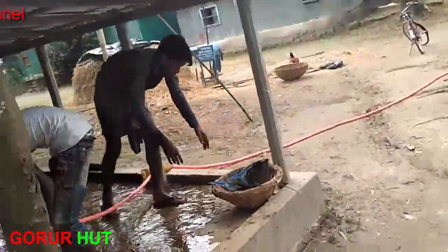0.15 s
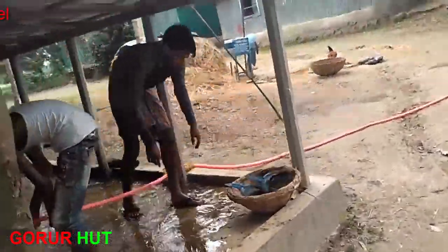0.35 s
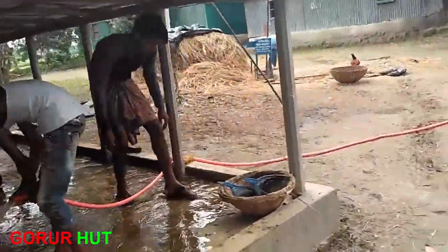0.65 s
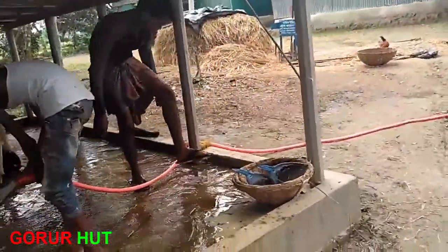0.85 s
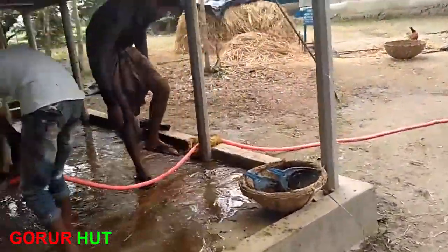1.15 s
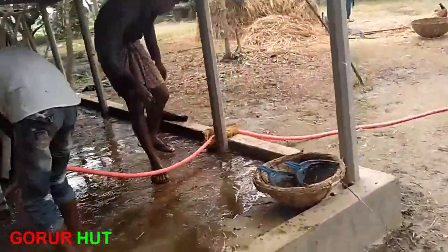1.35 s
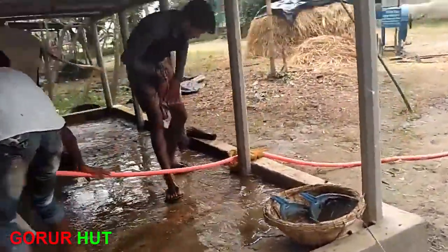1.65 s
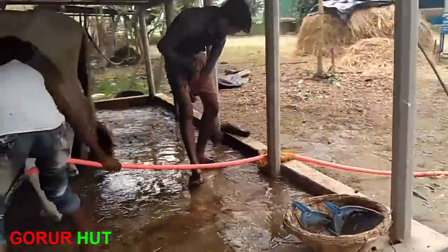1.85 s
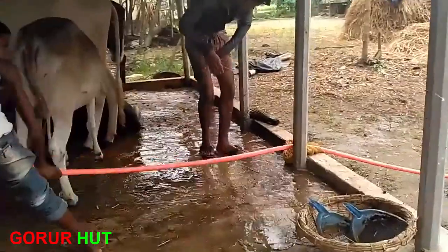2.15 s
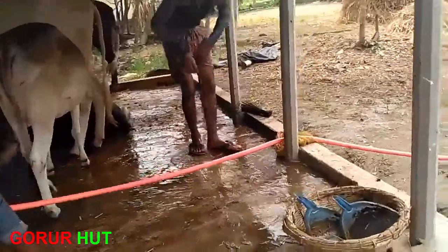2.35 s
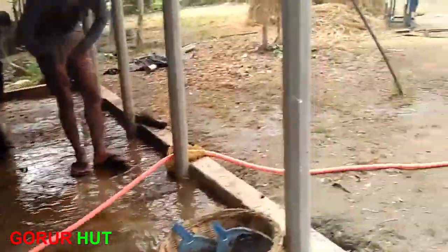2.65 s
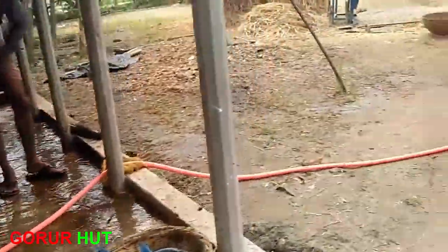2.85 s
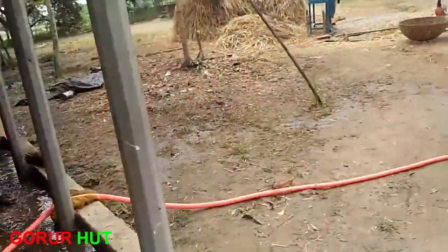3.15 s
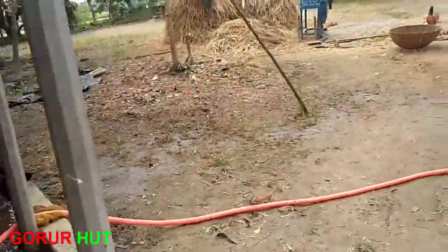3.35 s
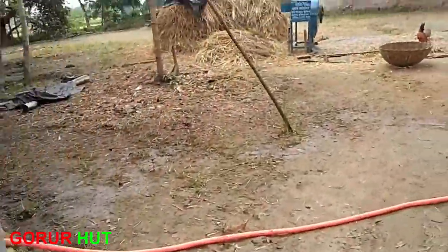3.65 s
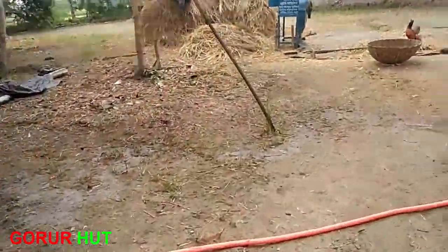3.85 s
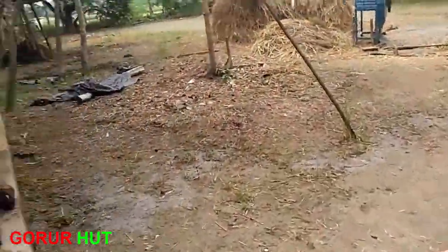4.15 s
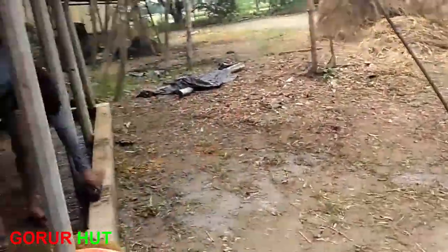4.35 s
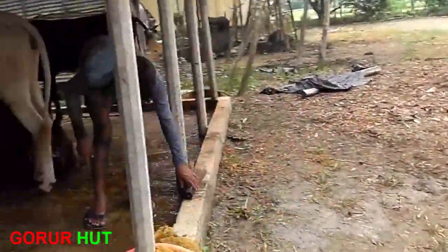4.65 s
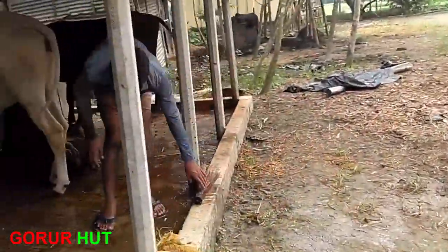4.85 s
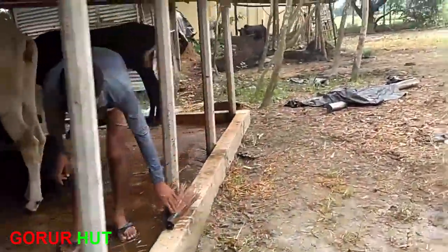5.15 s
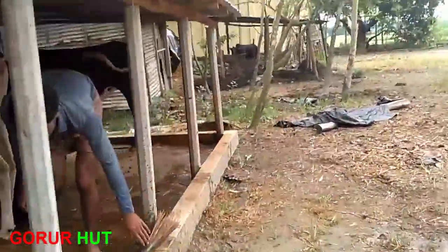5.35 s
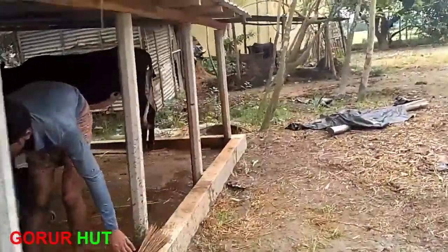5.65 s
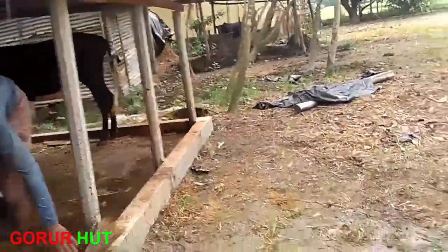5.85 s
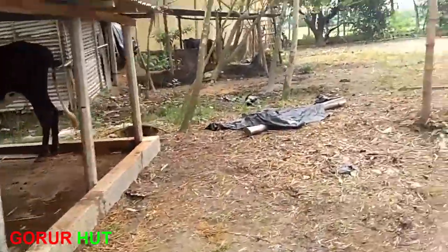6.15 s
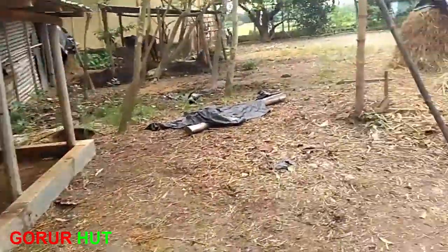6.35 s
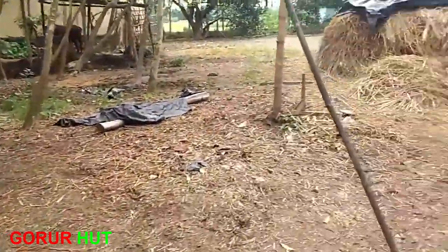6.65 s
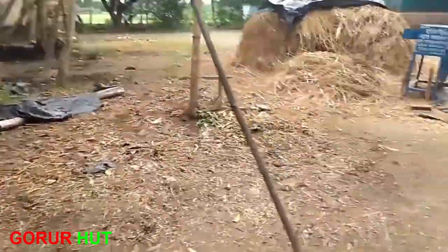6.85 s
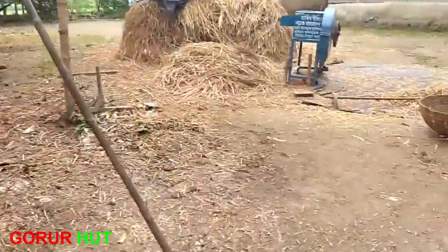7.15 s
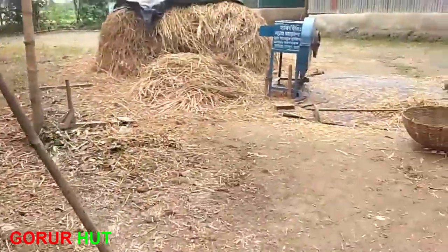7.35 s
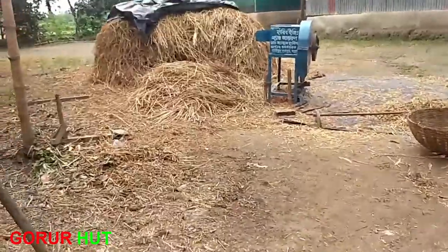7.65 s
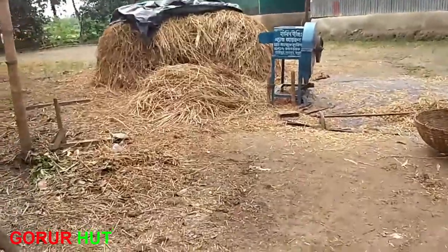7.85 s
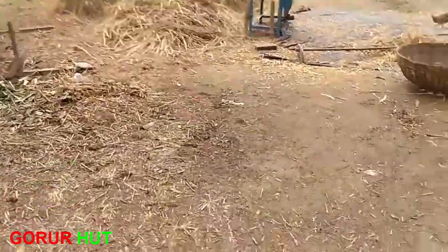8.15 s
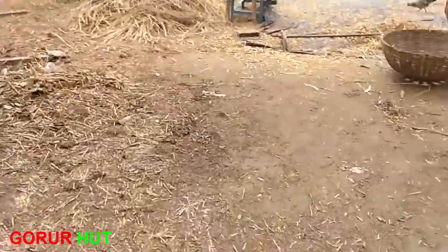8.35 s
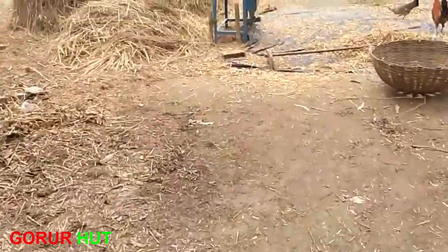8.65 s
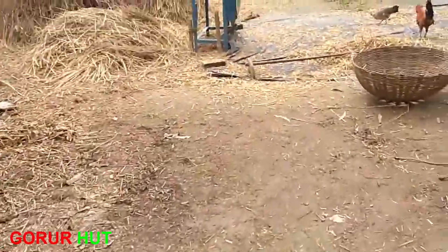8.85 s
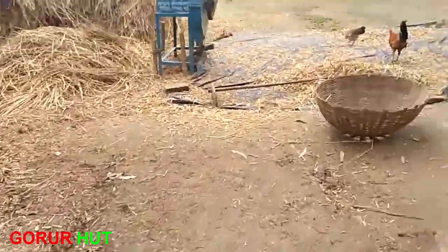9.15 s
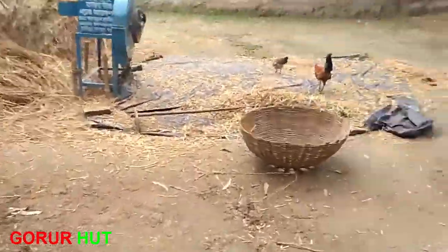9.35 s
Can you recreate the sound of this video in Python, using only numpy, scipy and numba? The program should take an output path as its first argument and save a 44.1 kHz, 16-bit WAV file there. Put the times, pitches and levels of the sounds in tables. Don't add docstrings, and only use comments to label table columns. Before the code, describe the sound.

Water splashes, slaps and trickles on wet concrete in an open farm shed, with bubbly burbles, drips, a faint pump hum and wind bumps.

```python
import sys
import numpy as np
from scipy import signal
from scipy.fft import rfft, irfft, next_fast_len
from scipy.io import wavfile
from scipy.ndimage import uniform_filter1d, map_coordinates
from numba import njit

SR = 44100
rng = np.random.default_rng(int(sys.argv[2]) if len(sys.argv) > 2 else 0)


def nominal_scale(level):
    x = np.asarray(level, float) / 20
    return 10 ** x


def unload_audio(sound):
    columns = np.transpose(np.atleast_2d(sound))
    steps = np.round(np.clip(columns, -1, 1) * 32767)
    wavfile.write(sys.argv[1], SR, steps.astype(np.int16))


N = 418509


def curve(table):
    s, *values = np.transpose(table)
    return [np.interp(np.arange(N) / SR, s, v) for v in values]


def upright(table):
    return [c[:, None] for c in np.transpose(table)]


def draws(events, kinds, count):
    return rng.random((events, kinds, count)).transpose(1, 0, 2)


def colour(x, points, share=1):
    hz, db = np.transpose(points)
    size = next_fast_len(N)
    f = np.maximum(np.arange(size // 2 + 1) * SR / size, 1)
    gain = nominal_scale(share * np.interp(np.log(f), np.log(hz), db))
    return irfft(rfft(x, size) * gain, size)[..., :N]


def unit(x):
    return x / np.sqrt(np.mean(x ** 2))


def hiss(lo_hz, hi_hz, channels=1):
    sos = signal.butter(3, [lo_hz, hi_hz], "band", fs=SR, output="sos")
    return unit(signal.sosfilt(sos, rng.standard_normal((channels, N))))


def walk(rate):
    k = int(SR / rate)
    steps = np.repeat(rng.standard_normal(N // k + 1), k)
    return 2.05 * uniform_filter1d(uniform_filter1d(steps, k), k)[:N]


def patches(start, hz, seconds=.028, octaves=0.258):
    field = rng.standard_normal((400, 40))
    return 1.68 * map_coordinates(field, [start / seconds, np.log2(hz / 300) / octaves], order=1)


@njit
def ring(n, start, hz, t60, gain, rise, swell):
    y = np.zeros(n)
    for k in range(len(start)):
        length = int(t60[k] * SR) + 1
        p = np.exp((2j * np.pi * hz[k] - np.log(1000) / t60[k]) / SR)
        glide = np.exp(2j * np.pi * hz[k] * rise[k] / SR / length)
        z, first = gain[k] + 0j, max(int(start[k] * SR), 0)
        for i in range(min(length, n - first)):
            grown = min(i * hz[k] / SR / swell, 1.)
            y[first + i] += z.imag * grown * grown * (3 - 2 * grown)
            z, p = z * p, p * glide
    return y


def bubbles(start, hz, t60, gain, rise, swell):
    spread = np.broadcast_arrays(start, hz, t60, gain, rise)
    flat = [np.array(a, dtype=float).ravel() for a in spread]
    return ring(N, *flat, swell)


def pump(db):
    hz = 185 + 1.6 * walk(9)
    line = np.sqrt(2) * np.sin(2 * np.pi * np.cumsum(hz) / SR) * nominal_scale(2.76 * walk(15))
    line_db = 0.59 * np.minimum(db + 53.5, 0) - 3.0
    housing = nominal_scale(-12.5) * hiss(298.8, 316)[0] + nominal_scale(-1.5) * hiss(131, 438)[0]
    return nominal_scale(db) * (nominal_scale(line_db) * line + housing)


# peak time in seconds, peak level in dB, pitch in Hz.
WIND_POPS = [(2.46, -41, 81), (2.511, -41, 91.6), (2.573, -33.5, 83.5), (3.177, -42, 101),
             (3.311, -39, 88.6), (4.097, -46, 97), (4.109, -43, 96.5), (4.493, -37, 97),
             (4.516, -32.5, 114), (6.309, -43, 106), (6.968, -34.5, 98.5), (7.045, -36.5, 127),
             (7.112, -26, 142), (7.136, -28, 121), (7.155, -33.5, 120), (7.211, -40.5, 83.5),
             (7.294, -40, 90), (7.367, -30.5, 127), (8.844, -34, 115), (8.874, -32.5, 135),
             (9.014, -35, 133), (9.148, -29.5, 80.7), (9.18, -16.5, 120), (9.212, -42, 92),
             (9.287, -20.5, 171), (9.36, -27, 113.5), (9.473, -33.5, 112)]
WAKE_DB, WAKE_S = -25.5, 0.046
GUST_DB = 3.2


def wind(db):
    s, pop_db, hz = np.transpose(WIND_POPS)
    pops = bubbles(s - .75 / hz, 1.07 * hz, 4.2 / hz, nominal_scale(pop_db + 9.0), -.6, 0.45)
    t = np.arange(N) / SR
    wake = sum(nominal_scale(2 * (d + WAKE_DB)) * np.exp(-np.abs(t - at) / WAKE_S * 2) for at, d in zip(s, pop_db))
    db = 10 * np.log10(nominal_scale(2 * db) + wake)
    rumble = hiss(50, 144.0, channels=2) * nominal_scale(db + GUST_DB * np.array([walk(21), walk(13)]))
    return rumble * nominal_scale([[7.0], [-9.0]]) + pops * nominal_scale([[0], [-21.0]])


DUCK_DB, DUCK_S = -4, 0.077


def wind_guard():
    s, pop_db, _ = upright(WIND_POPS)
    at = np.arange(0, N, 64)
    after = at / SR - s
    dip = nominal_scale(pop_db - pop_db.max()) * (after > 0) * np.exp(-np.maximum(after, 0) / DUCK_S)
    return nominal_scale(DUCK_DB * np.interp(np.arange(N), at, dip.sum(axis=0)))


# start in seconds, length in seconds, level of the middle drops in dB,
# fine spray in dB re middle, large drops in dB re middle.
GUSHES = [(0.245, 0.12, -52, -4.5, 2), (0.455, 0.36, -54, 0.5, -8.5), (0.677, 0.29, -57, 6.5, -19),
          (1.065, 0.37, -54.5, 6, -33), (1.553, 0.38, -71.5, 5.5, -19), (2.026, 0.26, -56.5, -5.5, -19),
          (2.378, 0.5, -62, -1, -3), (2.942, 0.33, -49.5, -2.5, -12.5), (3.186, 0.39, -58, -6, -12),
          (3.583, 0.31, -54.5, -5.5, -27), (4.096, 0.44, -62, 7.5, -7.5), (4.53, 0.81, -70.5, 14, -7),
          (5, 0.25, -52, 0.5, -17), (5.336, 0.45, -58.5, -0.5, -14), (5.76, 0.19, -52, -2, -13.5),
          (5.945, 0.36, -57.5, 5, -25), (6.195, 0.4, -51.5, -4.5, -4), (6.642, 0.25, -58, 3.5, -5.5),
          (6.883, 0.29, -50, -8, -7.5), (7.234, 0.38, -55.5, -10, 3.5), (7.603, 0.48, -58, -8.5, -2),
          (8.156, 0.58, -50.5, -6, -11.5), (8.744, 0.28, -49.5, -7.5, -1.5), (9.046, 0.2, -54.5, -12, -1),
          (9.227, 0.37, -59, -11, -6)]
TRICKLE_DB = [
    -80.5,
    -70,
    -73,
]
GUSH_ATTACK_S, GUSH_SAG_DB_PER_S, GUSH_DRAIN_DB_PER_S = 0.097, -2, 86.5


def gushes():
    t = np.arange(0, N / SR + .01, .004)
    s, length, db, fine_db, large_db = upright(GUSHES)
    fall_db = GUSH_SAG_DB_PER_S * (t - s) + GUSH_DRAIN_DB_PER_S * np.maximum(t - s - length, 0)
    shape = np.clip((t - s) / GUSH_ATTACK_S, 0, 1) ** 2 * nominal_scale(2 * (db - fall_db))
    levels = []
    for size_db, trickle_db in zip((fine_db, 0, large_db), TRICKLE_DB):
        power = np.sum(shape * nominal_scale(2 * size_db), axis=0) + nominal_scale(2 * trickle_db)
        levels.append(np.interp(np.arange(N) / SR, t, 10 * np.log10(power)))
    return levels


# lowest pitch in Hz, highest pitch in Hz, drops a second, ring in cycles,
# size spread in dB, smooth hiss in dB re drops.
DROPLET_SIZES = [
    (3850, 8150, 1800, 11, 8, 1.5),
    (1658, 3480, 700, 3.55, 5.5, 1.5),
    (520, 1553, 700, 4.6, 3.5, -1),
]
SURGE_DB, PATCHY_DB = .7, 1.3


def flow():
    near, blur, surge = 0, 0, walk(11)
    for (lo, hi, rate, cycles, spread_db, smooth_db), db in zip(DROPLET_SIZES, gushes()):
        u = rng.random((30000, 5)).T
        start = np.cumsum(-np.log(u[0])) / rate
        hz = lo * (hi / lo) ** u[1]
        size_db = spread_db * np.minimum(-np.log(u[2]), 3.0) + 2.44 * patches(start, hz)
        ringing = 2.9 * cycles * (1 + 5.2 * u[4] ** 6)
        strength = nominal_scale(size_db) * np.sqrt(hz / ringing) * (start < N / SR)
        drops = bubbles(start, hz, ringing / hz, strength, 0.49 * u[3], 2.27)
        gain = nominal_scale(db + SURGE_DB * surge + 1.01 * walk(30)) / np.sqrt(1 + nominal_scale(2 * smooth_db))
        near = near + gain * unit(drops)
        edges = np.geomspace(lo, hi, 4)
        patchy = sum(nominal_scale(PATCHY_DB * walk(25)) * hiss(a, b, channels=2) for a, b in zip(edges, edges[1:]))
        blur = blur + gain * nominal_scale(smooth_db) * unit(patchy)
    return near, blur


# start in
# seconds, length in seconds, level in dB, first pitch in Hz, last pitch in Hz.
BURBLES = [(0.266, 0.025, -25, 2330, 2350), (0.267, 0.029, -28.5, 1770, 1720),
           (8.574, 0.014, -31.5, 2060, 2100), (9.006, .006, -33, 1650, 1800), (0.54, .065, -40, 5100, 5070),
           (0.541, .15, -47.5, 1290, 1320), (0.749, 0.055, -41.5, 5200, 5330),
           (0.753, .06, -46, 3780, 3740), (6.199, 0.18, -47.5, 2620, 2570), (6.345, 0.17, -42, 2550, 2460),
           (6.506, 0.11, -53, 2500, 2560), (3.093, .022, -35.5, 5350, 5100),
           (0.173, 0.055, -48, 3750, 3750), (0.42, 0.012, -38, 3900, 4000),
           (1.159, 0.013, -36.5, 4000, 3640), (1.26, .035, -43, 3840, 3850),
           (1.263, 0.023, -45, 1340, 1280), (1.657, .012, -33.5, 2300, 2250),
           (2.76, 0.024, -46.5, 2330, 2090), (3.091, 0.021, -42, 4900, 5170),
           (3.619, 0.036, -40, 2500, 2360), (3.695, .03, -35.5, 2680, 2720),
           (3.702, 0.068, -39.5, 2250, 2350), (3.787, 0.041, -46, 3560, 3900),
           (3.819, 0.016, -37, 2180, 2200), (3.873, 0.035, -46.5, 2540, 2080),
           (4.016, 0.0073, -45, 2830, 2850), (4.048, 0.025, -42.5, 3660, 3700),
           (4.267, 0.013, -36.5, 2250, 2200), (4.328, .06, -45, 2330, 2550),
           (4.397, 0.053, -46, 5260, 5000), (4.629, 0.027, -40, 5660, 6000),
           (7.593, 0.024, -38, 2500, 2810), (7.611, 0.013, -36, 3900, 4040), (8.604, .025, -32, 2420, 2460),
           (8.7, 0.19, -53.5, 2770, 2900), (8.953, 0.016, -33.5, 4520, 4770),
           (8.948, 0.027, -30.5, 3250, 3380), (5.023, 0.023, -36.5, 2120, 2130),
           (0.163, 0.013, -36, 312, 302), (0.22, 0.029, -40, 950, 1400), (0.238, 0.063, -36, 322, 298),
           (2.931, 0.036, -36, 320, 308), (3.304, 0.041, -38, 477, 520), (4.141, .04, -43, 1160, 1180),
           (6.207, 0.17, -43, 410, 430), (6.5, 0.18, -47, 425, 400), (8.677, .25, -49, 760, 780),
           (8.863, .1, -46, 880, 890), (0.274, .03, -33, 845, 790)]
BURBLE_SPREAD, BURBLE_CYCLES, BURBLE_GAP_S = 0.062, 30, .004


def burbles(count=40):
    s, length, db, first_hz, last_hz = upright(BURBLES)
    u = draws(len(s), 3, count)
    late = BURBLE_GAP_S * (np.arange(count) + u[0])
    spread = BURBLE_SPREAD * np.maximum(1800 / first_hz, 1)
    drift_hz = first_hz + (last_hz - first_hz) * np.minimum(late / length, 1)
    hz = drift_hz * (1 + spread * (2 * u[1] - 1))
    gain = nominal_scale(db + 3.8 * np.minimum(-np.log(u[2]), 2.5)) * (late < length)
    t60 = BURBLE_CYCLES * BURBLE_SPREAD / spread / hz
    return bubbles(s + late, hz, t60, gain, 0.033, 2.02)


# start in seconds, peak level in dB, pitch in Hz, climb as a share of pitch.
CHIRPS = [
    (2.451, -36, 794, 0.17),
    (2.474, -44.5, 930, 0.18),
    (2.503, -53, 557, .5),
    (2.522, -48.5, 797, 0.7),
    (2.638, -43.5, 1110, 0.32),
    (2.68, -51, 1260, .4),
]


def chirps():
    s, db, hz, climb = np.transpose(CHIRPS)
    return bubbles(s, hz, 38 / hz, nominal_scale(db + 6.5), climb, 5.1)


# start in seconds, peak level in dB, pitch in Hz.
DRIPS = [(0.431, -44, 1770), (1.475, -34, 4170), (1.5483, -36, 4460), (1.564, -37, 4670),
         (1.5934, -45, 5030), (1.606, -45, 5160), (1.6174, -27, 5460), (1.6766, -25, 3840),
         (2.129, -37, 2450), (2.254, -44, 3120), (3.12, -31, 2040), (3.711, -43, 2320), (3.821, -42, 2370),
         (3.897, -37, 2120), (4.094, -40, 1840), (4.2173, -43, 5250), (5.6982, -38, 4500),
         (6.3701, -34.5, 2420), (3.3723, -34, 2550), (6.802, -34, 4480), (6.899, -33.5, 2220)]


def drips(count=5):
    s, db, hz = upright(DRIPS)
    u = draws(len(s), 2, count)
    hz = hz * 1.6 ** (u[0] - .5)
    return bubbles(s + 0.0018 * u[1], hz, 30.3 / hz, nominal_scale(db - 3.0), 0.072, 1.67)


# start in seconds, peak level in dB, pitch in Hz.
PLOPS = [(0.241, -29.5, 800), (0.818, -44.5, 880), (0.442, -35.5, 1036), (0.512, -33, 937),
         (0.62, -41, 930), (0.729, -37, 955), (0.764, -46, 520), (1.248, -40.5, 1335), (1.434, -41.5, 1370),
         (1.93, -38, 1243), (1.983, -51, 703), (2.793, -36, 452), (3.081, -33, 1080), (3.21, -31, 944),
         (4.14, -37.5, 1054), (4.621, -33, 1050), (5.526, -47, 462), (5.87, -37.5, 372),
         (6.462, -37.5, 321), (6.838, -39, 470), (7.715, -41, 935), (7.92, -41.5, 763), (8.049, -43, 573),
         (8.531, -31.5, 930), (8.647, -32, 454), (8.884, -35.5, 840), (9.006, -38, 1020),
         (9.462, -42, 1000)]


def plops():
    s, db, hz = np.transpose(PLOPS)
    t60 = 0.035 * (900 / hz) ** 0.41
    u = rng.random((len(s), 6)).T
    pocket = bubbles(s, hz, t60, nominal_scale(db + 2.0), 0.27, 1.3)
    neighbour = bubbles(s + 0.022 * u[0], hz * (0.945 + 0.27 * u[1]), 0.68 * t60, nominal_scale(db - 5.0), 0.12, 0.22)
    smack = bubbles(s + 0.0088 * u[4], hz * (1.4 + 0.93 * u[5]), 0.44 * t60, nominal_scale(db - 11.0), 0.067, 0.84)
    last = bubbles(s + 0.063 * u[2], hz * (0.833 + 0.381 * u[3]), 1.65 * t60, nominal_scale(db - 9.5), 0.21, 0.44)
    return pocket + neighbour + smack + last


# start in seconds, peak level in dB, centre pitch in Hz.
TICKS = [(0.2415, -14.5, 1440), (0.2658, -8.5, 1890), (0.3942, -22, 1920), (1.311, -38, 5530),
         (1.507, -33, 5000), (1.513, -43, 5000), (1.597, -29, 5030), (1.6884, -26.5, 4240),
         (1.6835, -28, 5500), (3.0805, -25, 2960), (3.2127, -16, 3550), (3.2212, -23, 2430),
         (3.2102, -15, 2200), (3.21, -17, 5170), (1.588, -25.5, 5360), (1.587, -40, 1380),
         (1.6078, -35, 5000), (1.5632, -31, 5700), (1.563, -40, 1530), (1.6585, -24, 4500),
         (1.661, -27, 4100), (2.73, -42, 3500), (5.041, -33, 2270), (2.207, -31, 3600), (7.554, -32, 2100),
         (5.2772, -32.5, 2400), (5.5905, -34, 2050), (8.6098, -31, 2380), (8.957, -30, 4530),
         (3.372, -30, 5000), (3.4104, -31.5, 4770), (3.7373, -39, 2410), (3.789, -28.5, 2850),
         (3.9596, -49, 2200), (4.1414, -23, 3220), (4.6964, -54, 5600), (4.713, -43, 5530),
         (4.7413, -53, 5210), (5.0055, -33.5, 5170), (5.1, -41, 5160), (5.1053, -40, 4680),
         (5.1375, -29.5, 3790), (5.5425, -50, 5390), (5.646, -30, 4100), (7.594, -39, 2220),
         (7.597, -40, 2830), (7.611, -26, 2350), (7.917, -49, 2690), (8.8337, -42, 2830),
         (8.858, -28, 2950), (5.875, -31, 1210), (6.802, -29, 4580), (8.199, -43, 2970),
         (9.0048, -21.5, 1440), (9.0097, -15.5, 1760)]


def ticks():
    s, db, hz = np.transpose(TICKS)
    partials = [(1.014, 5.0), (1.35, -7.5), (0.82, -10.5)]  # (pitch ratio, dB)
    return sum(bubbles(s, np.minimum(hz * k, 7000.), 10 / hz, nominal_scale(db + d), 0, 0.87) for k, d in partials)


def splash(table, t60, breakup_s, crack_db, bunching=1.6, thin_db=16, ahead=.25, count=140):
    s, db, top_hz, fine_db, *large_db = upright(table)
    large_db = large_db[0] if large_db else -41.5
    u = draws(len(s), 4, count)
    late = .6 * t60 * u[0] ** bunching
    first = s - ahead * breakup_s
    hz = 500 * (7500 / 500) ** u[1]
    fine, large = np.clip(np.log2(hz / 2600), 0, 1), np.clip(np.log2(1600 / hz), 0, 1)
    size_db = fine * (fine_db + 4.0) + large * large_db
    near_top_db = 12.0 * np.exp(-(np.log(hz / top_hz) / 0.14) ** 2)
    scatter_db = 1.93 * np.minimum(-np.log(u[2]), 3.0) + 2.27 * patches(s + late, hz, seconds=.03)
    scatter_db -= thin_db * np.exp(-late / breakup_s)
    drop_db = db - 10 * np.log10(count / 20.3) + size_db + near_top_db - 60 * late / t60 + scatter_db
    shower = bubbles(first + late, hz, 17.95 / hz, nominal_scale(drop_db), 0.53 * u[3], 1.5)
    crack = bubbles(s, top_hz, 12 / top_hz, nominal_scale(db + crack_db), 0, 0.61)
    return shower + crack


# start in seconds, peak level in dB, strongest pitch in Hz, fine spray in dB re peak.
SPATTERS = [(0.7292, -39.5, 5100, 11), (0.908, -30.5, 1780, -7), (1.4348, -42, 4600, 13.5),
            (1.5439, -37, 4560, 12), (1.5877, -22.5, 5300, -12), (1.6575, -29.5, 4400, 3),
            (2.0906, -19.5, 4480, -14), (2.2062, -31, 3560, -9), (2.388, -27.5, 4530, -5.5),
            (2.6843, -41, 4600, 10.5), (2.9342, -26, 2900, -24), (3.2103, -14, 2260, -3),
            (3.372, -34, 2520, 14), (3.479, -34.5, 2100, -11), (3.6314, -39, 2590, 2),
            (4.0533, -46, 3700, 10), (4.2703, -33, 2140, 6), (4.416, -28, 2700, 7), (4.559, -39, 5450, -8),
            (5.04, -27, 2270, 7), (5.2767, -22, 2250, -22), (5.4703, -29, 2010, 2.5),
            (5.59, -25, 1960, 2.5), (6.578, -31.5, 2350, -27), (6.8005, -29, 4400, -5),
            (6.898, -34, 2200, -10), (7.0814, -28, 2140, 2.5), (7.4617, -32, 2800, -10),
            (8.5765, -17, 2090, -3.5)]


def spatters():
    return splash(SPATTERS, 0.09, 0.005, -0.71, count=320)


# start in seconds, peak level in dB, strongest pitch in Hz, fine spray in dB re peak,
# large drops in dB re peak.
SLOSHES = [(0.5033, -34.5, 1660, 0, -8), (1.17, -22.5, 4060, -6.5, -42), (1.693, -27, 3700, 7.5, -48),
           (3.11, -33.5, 3900, 16, -30), (3.19, -19.5, 2210, 3.5, -28), (3.6886, -34, 2740, 1, -58),
           (4.405, -27.5, 3550, 6.5, -48), (5.1375, -14, 4070, -11.5, -37), (5.86, -21.5, 1940, -17, -24),
           (7.5986, -31, 2520, -15, -30), (7.9166, -24, 2590, -45, -25), (8.88, -18.5, 3020, -5.5, -29),
           (8.95, -15, 3660, -14, -25)]


def sloshes():
    return splash(SLOSHES, 0.24, 0.02, -22.0, bunching=1.1, thin_db=12.0, ahead=0.99, count=500)


# start in seconds, peak level in dB, strongest pitch in Hz, fine spray in dB re peak,
# large drops in dB re peak.
SLAPS = [(0.157, -40, 5040, -5, -33), (0.193, -32.5, 1910, -6, -19), (0.2411, -15.5, 1670, -3.5, -11),
         (0.2663, -14.5, 1750, -6.5, -6), (0.3955, -21.5, 1740, -15, -12), (0.5192, -25, 1710, -9, -14),
         (1.1184, -36.5, 5600, 3.5, -29), (1.3118, -30, 5300, -3, -19), (2.7927, -34, 1430, -13, 0),
         (2.868, -35, 1610, -22, 0), (3.1911, -25.5, 2130, -5, -12), (4.1409, -25, 1180, 4, -12),
         (4.6269, -52.5, 5900, 15, 11), (5.4235, -45, 5240, 8.5, -5), (5.873, -30.5, 2860, -38, -3),
         (5.9802, -26.5, 5650, -16, -24), (6.8359, -25.5, 1900, 0.5, -10), (7.5532, -29, 2120, -15, -5.5),
         (7.7159, -30, 2420, -3.5, -5), (7.9391, -26.5, 2440, -20, -18), (8.0481, -37.5, 2330, -39, 4),
         (8.1994, -29.5, 2100, -6, -14.5), (9.0075, -25.5, 1740, -3, -24)]


def slaps():
    return splash(SLAPS, 0.085, 0.0025, -1.0, count=280)


SHED_T60_S, SHED_DB = 0.21, -5.5


def shed(x, size=16384):
    out, t = np.zeros((2, N + 3 * size)), np.arange(size // 2) / SR
    padded = np.pad(x, size)
    for i in range(-size // 2, N, size // 2):
        tail = rng.standard_normal((2, len(t))) * nominal_scale(-60 * t / SHED_T60_S) * (t > .002)
        piece = (padded[i + size:i + 2 * size] * np.hanning(size) ** .5)[None]
        echo = signal.fftconvolve(piece, tail / np.sqrt(np.sum(tail[0] ** 2)), axes=1)
        out[:, i + size:i + size + echo.shape[1]] += echo
    return out[:, size:size + N]


# frequency in Hz, lead in radians.
LEFT_LEAD = [(60, 0.045), (850, 1.55), (1400, 0.66), (3000, 0.9), (4600, 0.05)]


def lead(x):
    hz, radians = np.transpose(LEFT_LEAD)
    size = next_fast_len(N)
    turn = np.interp(np.arange(size // 2 + 1) * SR / size, hz, radians)
    return irfft(rfft(x, size) * np.exp(1j * turn), size)[:N]


# time in seconds, wind level in dB, pump hum level in dB.
AIR = [(0, -68, -72), (.29, -88, -57), (.4, -73.5, -67.5), (1.56, -78, -77.5), (2.75, -72, -65),
       (3.25, -62.5, -57), (3.57, -79, -69.5), (4.5, -73.5, -72), (5.12, -78, -69.5), (5.92, -73.5, -69.5),
       (6.37, -64.5, -63.5), (6.61, -83, -68.5), (7.11, -61.5, -59), (7.98, -77, -60.5), (8.3, -70.5, -69),
       (8.4, -59.5, -55.5), (8.99, -60.5, -47), (9.09, -74, -62.5), (9.49, -65, -58)]
# time in seconds, left minus right in dB, left late by ms.
AIM = [(0, 8, 0.24), (1.64, 10, 0.33), (1.93, 5.5, 0.34), (3.2, 7.5, 0.43), (4.6, 6, 0.38), (5.2, 7, .35),
       (6.7, 6, 0.471), (7.7, 2.5, 0.37), (8.6, 7, 0.32), (9.49, 2.5, 0.29)]
# frequency in Hz, left against right in dB (about two thirds of it is applied,
# on top of the aim).
PORTS = [(60, -9), (400, -4), (1000, 0.5), (1800, 3), (5300, 3.5), (7500, -12.5), (9000, -9.5)]


def scene():
    wind_db, pump_db = curve(AIR)
    pan_db, delay_ms = curve(AIM)
    drops, blur = flow()
    water = drops + burbles() + chirps() + drips() + plops() + ticks()
    water = water + spatters() + sloshes() + slaps()
    low_cut = signal.butter(2, 150, "high", fs=SR, output="sos")
    source = signal.sosfilt(low_cut, water) + pump(pump_db)
    delay_ms = delay_ms + .05 * walk(12)
    late = lead(map_coordinates(source, [np.arange(N) - delay_ms * SR / 1000], order=3))
    ports = np.array([late, source]) + blur + nominal_scale(SHED_DB) * shed(source)
    ports = ports * nominal_scale(2.0 + np.array([pan_db, -pan_db]) / 2)
    ports = np.array([colour(ports[0], PORTS, share=0.36), colour(ports[1], PORTS, share=-0.29)])
    yard = nominal_scale(-75.0) * hiss(200, 8900, channels=2)
    return ports * wind_guard() + wind(wind_db) + yard


# frequency in Hz, gain in dB.
MIC = [(30, -8), (66, 2), (400, -5), (1000, -3.5), (2500, -4.5), (5400, 2), (6400, 0), (7200, -5.5),
       (7700, -15), (8070, -28), (8500, -6.5), (9200, -3), (9750, -9), (10300, -85)]


def microphone(x):
    return colour(x, MIC)


FAINT_DB, FAINT_HZ, HOLES_DB = -82.5, 7100, 45


def drop_faint(x, size=2048, count=16):
    hz, _, z = signal.stft(x, SR, nperseg=size)
    power = np.add.reduceat(np.abs(z) ** 2, np.arange(0, len(hz), count), axis=1)
    ragged = uniform_filter1d(rng.standard_normal(power.shape), size=3)
    loud = power > nominal_scale(2 * FAINT_DB + HOLES_DB * ragged)
    keep = np.repeat(loud, count, axis=1)[:, :len(hz)] | (hz < FAINT_HZ)[:, None]
    return signal.istft(z * keep, SR, nperseg=size)[1][:, :N]


def top_cut(x):
    return signal.sosfilt(signal.butter(12, 9950, fs=SR, output="sos"), x)


def record(dry):
    mix = drop_faint(microphone(dry))
    return top_cut(mix)


dry = scene()
out = record(dry)
unload_audio(out)
```